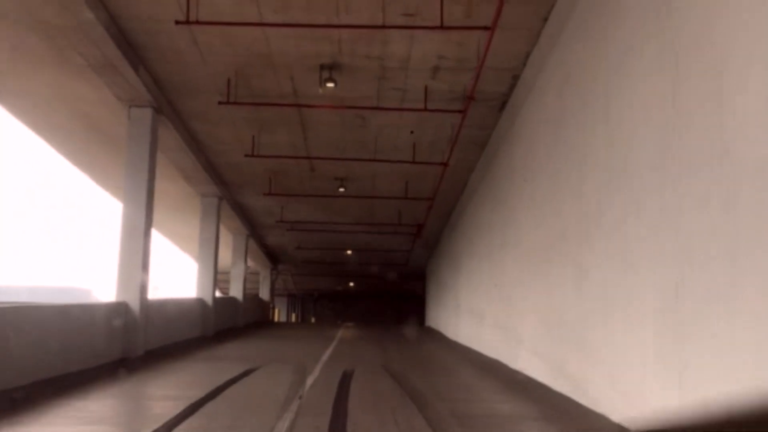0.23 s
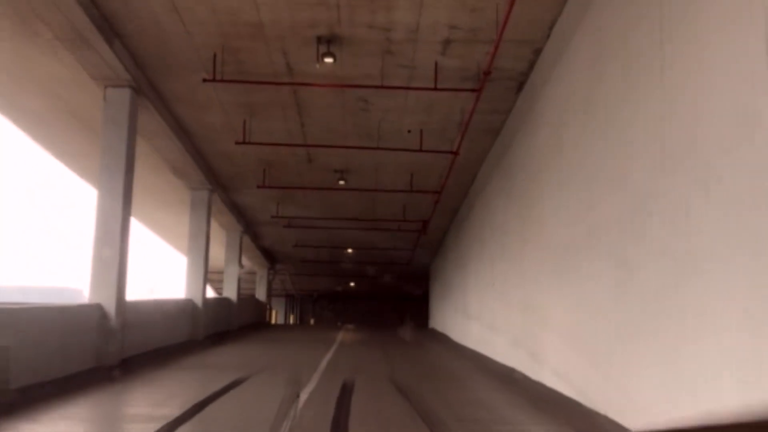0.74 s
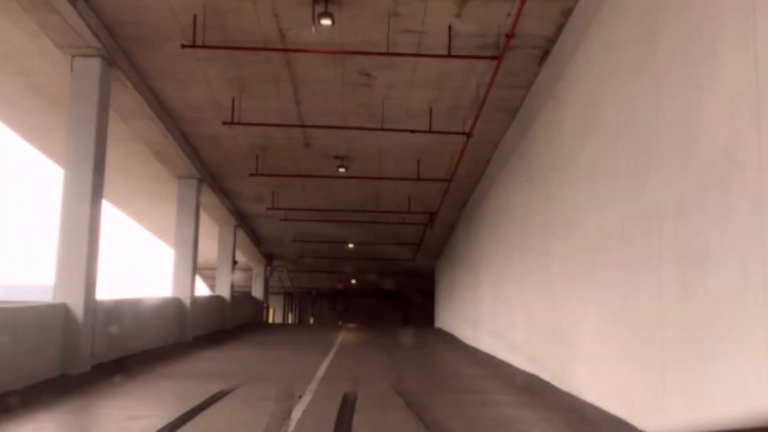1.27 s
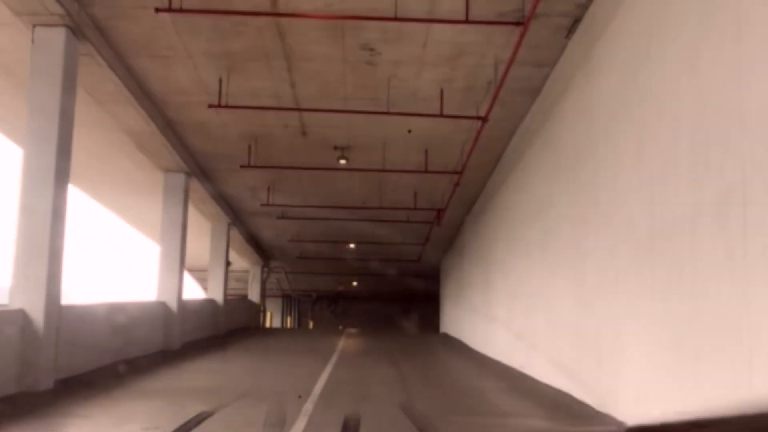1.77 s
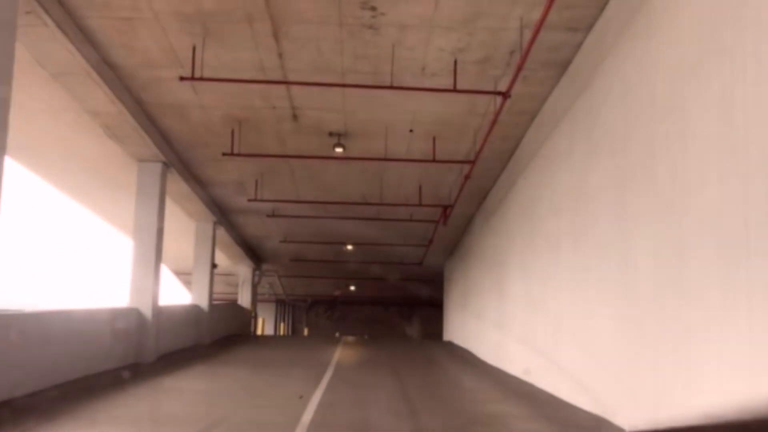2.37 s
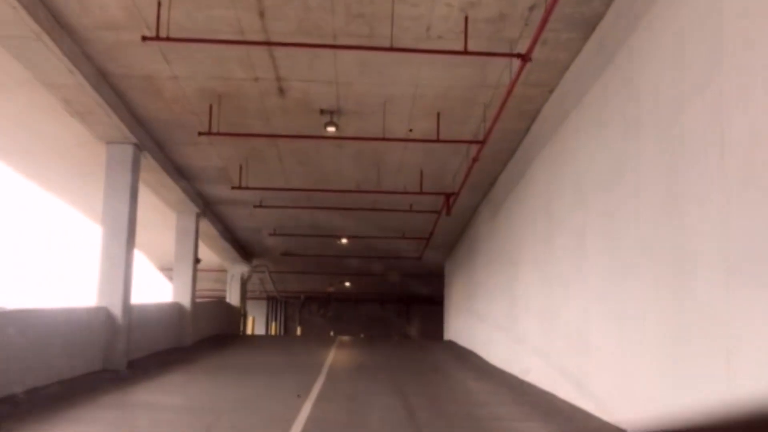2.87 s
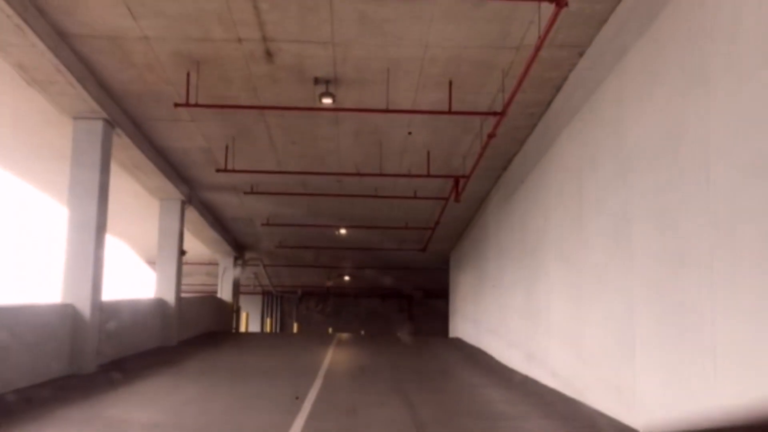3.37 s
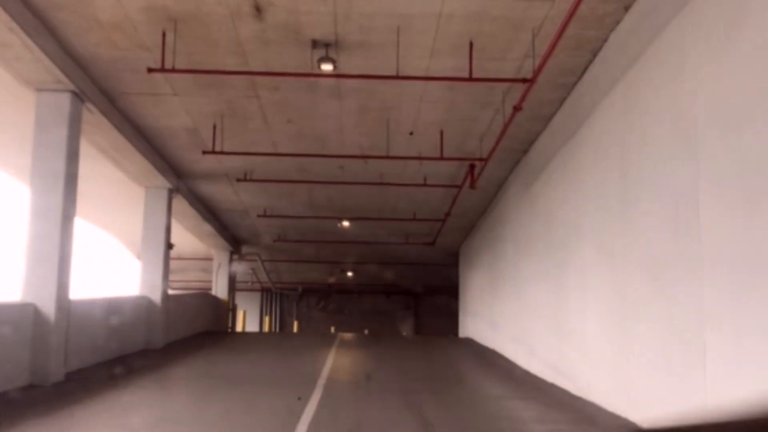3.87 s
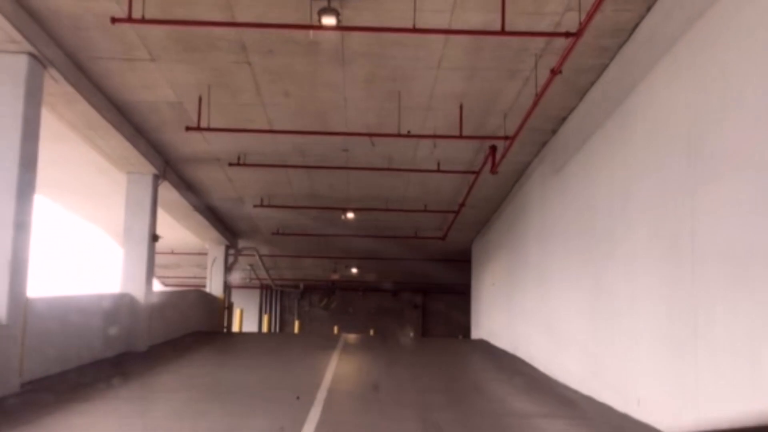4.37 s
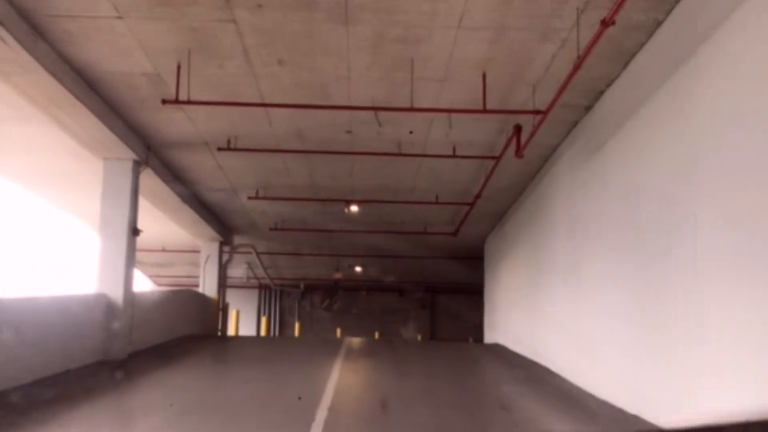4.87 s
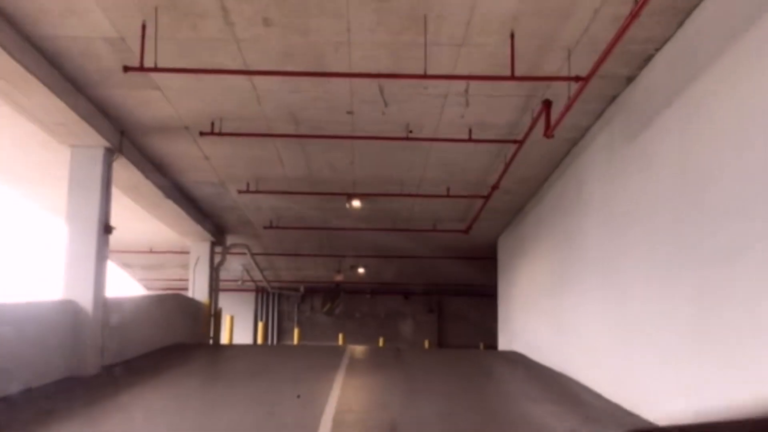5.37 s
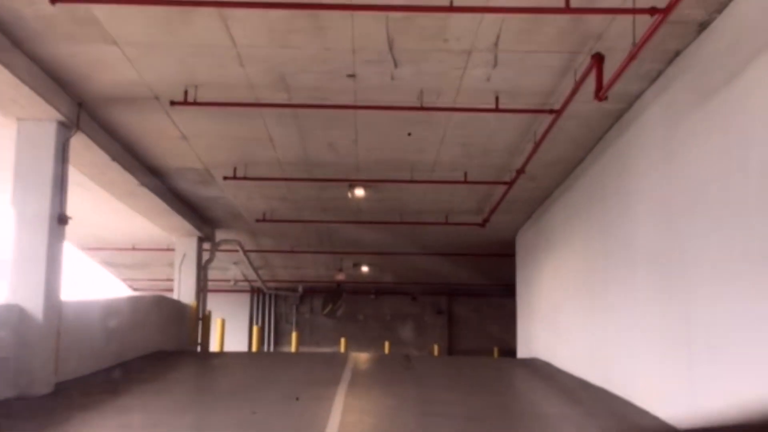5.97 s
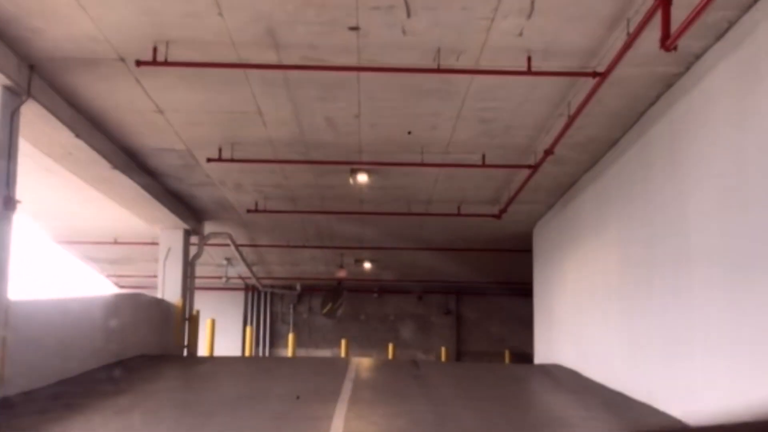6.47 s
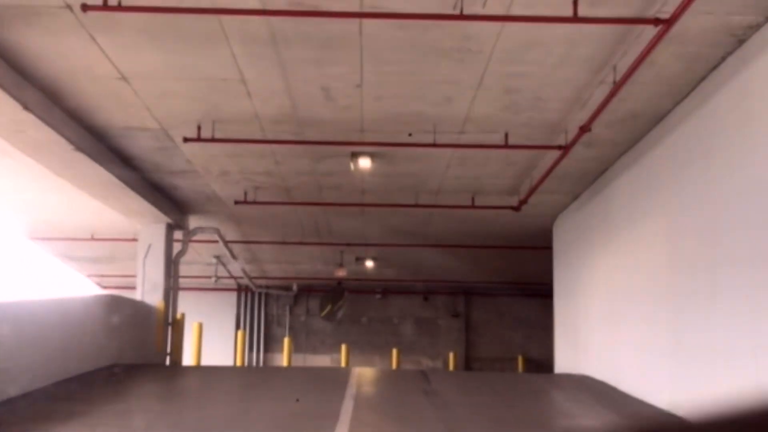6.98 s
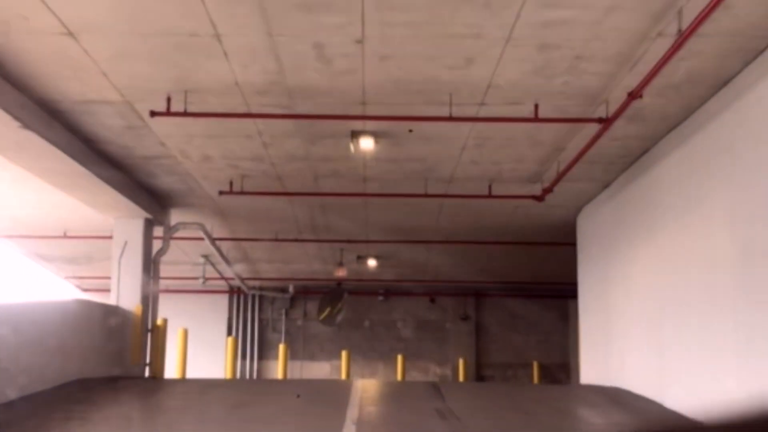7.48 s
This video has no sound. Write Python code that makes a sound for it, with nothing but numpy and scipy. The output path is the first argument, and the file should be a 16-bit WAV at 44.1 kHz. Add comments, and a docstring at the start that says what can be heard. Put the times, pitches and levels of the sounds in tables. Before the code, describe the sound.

The inside of a car driving slowly up a concrete ramp, about 7.7 seconds, continuous from start to end. A deep engine boom just under 60 hertz dominates, throbbing irregularly and beating with a weaker, slightly lower driveline hum. Muffled tyre rumble fills the bass, with faint roar in the mids that rises briefly on coarse patches, around 0.2, 1.5, 2.2, 3.1 and 4.4 seconds. Vents hiss softly and evenly above. At about 2.9 seconds the boom drops away, returning by 3.4 and strongest around 4 to 4.7. A low accessory hum near 90 hertz wavers, clearer after 4.5. Revs sag slightly from 5.2 to 6.4, where the boom dips again; a dull bump rocks the body at 6.6, with a lighter knock-like rumble at 6.8. Revs recover slightly and the drone continues. Dry, enclosed, single-channel cabin sound with gentle levelling.

```python
"""Car climbing a garage ramp

Inside a car on a concrete ramp at low, nearly steady revs. Vents hiss evenly, with faint early echoes.
A steady driveline hum beats against the engine's firing-order boom; a belt-driven accessory hums higher up.
Filtered noise makes the tyres: a body rumble that rocks on bumps, a roar that rises on coarse concrete.
Gentle gain control turns loud stretches, such as a strong boom, down and quiet ones up."""
import sys
import numpy as np
from scipy import signal
from scipy.fft import rfft, irfft
from scipy.io import wavfile

SR = 44100
rng = np.random.default_rng(int(sys.argv[2]) if len(sys.argv) > 2 else 0)


def transcribe(u):
    """Save the signal u as a 16-bit wav file named by the first command-line argument.

    u: samples, shape (n,) or (channels, n), limited to [-1, 1]; the rate is SR.
    q: integer samples, one column per channel.
    """
    v = np.clip(np.atleast_2d(u).T, -1, 1)
    q = np.round(v * 32767).astype(np.int16)
    wavfile.write(sys.argv[1], SR, q)


N = 340452  # length in samples


def undb(db):
    """Decibels to amplitude gain."""
    return 10 ** (np.asarray(db) / 20)


def unit(x):
    """Scale to rms 1."""
    return x / np.sqrt(np.mean(x ** 2))


def controls(table):
    """Each column after time, joined by straight lines at every sample."""
    times_s, *columns = np.transpose(table)
    t = np.arange(N) / SR
    return [np.interp(t, times_s, column) for column in columns]


def wander(rate_hz):
    """Smooth random motion of rms 1, mostly slower than the given rate."""
    f = np.arange(N // 2 + 1) * SR / N
    spectrum = rfft(rng.standard_normal(N))
    return unit(irfft(spectrum * np.exp(-(f / rate_hz) ** 2), N))


def swell(at_s, half_s):
    """A smooth bell-shaped rise to 1 and fall around a moment."""
    t = np.arange(N) / SR
    return np.exp(-((t - at_s) / half_s) ** 2)


def colour(x, points):
    """Shape a spectrum through (Hz, dB) points, rolled off below the first, then scale to rms 1."""
    hz, db = np.transpose(points)
    f = np.maximum(np.arange(N // 2 + 1) * SR / N, 1)
    curve_db = np.interp(np.log(f), np.log(hz), db)
    low_cut = np.minimum(f / hz[0], 1) ** 2
    return unit(irfft(rfft(x) * undb(curve_db) * low_cut, N))


def resonate(x, hz, width_hz):
    """One ringing resonance, scaled to rms 1."""
    b, a = signal.iirpeak(hz, hz / width_hz, fs=SR)
    return unit(signal.lfilter(b, a, x))


def cabin(x, count=40, longest_s=0.06, decay_s=0.053):
    """Glass and trim return faint early echoes that ripple the spectrum."""
    echo_db = -25  # against the direct sound, before the decay
    lags_s = rng.uniform(longest_s / 10, longest_s, count)
    signs = rng.choice([-1, 1], count)
    response = np.zeros(SR // 2)
    response[0] = 1  # direct sound
    response[(lags_s * SR).astype(int)] = undb(echo_db) * np.exp(-lags_s / decay_s) * signs
    return signal.fftconvolve(x, response / np.linalg.norm(response))[:N]


# air leaving the vents: (frequency [Hz], relative level [dB per Hz])
VENT_SPECTRUM = [(500, 0.5), (1900, 3.5), (2300, 4), (2720, 3.5), (2930, -1), (3600, 1), (4500, -1),
                 (4900, -5.5), (6000, -2), (7000, -2), (7600, -9.5), (9200, -11), (10300, -21.5),
                 (15800, -23.5)]
# narrow resonances of the air ducts: (frequency [Hz], width [Hz], level against the hiss [dB])
DUCT_RESONANCES = [(2127, 65, -12.5), (11500, 700, -28.5)]
# strength of the airflow: (time [s], hiss level [dB])
AIR_LEVEL = [(0, -53), (2.8, -53.5), (4.3, -54), (5.8, -54.5), (7.72, -54)]


def vents():
    """Turbulent air hisses from the grilles and rings the ducts faintly."""
    air_db, = controls(AIR_LEVEL)
    hiss = colour(rng.standard_normal(N), VENT_SPECTRUM) * undb(0.52 * wander(17))
    ducts = sum(undb(db) * resonate(rng.standard_normal(N), hz, width_hz)
                for hz, width_hz, db in DUCT_RESONANCES)
    return (hiss + ducts) * undb(air_db)


def driveline():
    """A weak hum at the steady road speed; it beats against the engine's boom."""
    hum_hz, hum_db = 54.3, -46.5
    turn = 2 * np.pi * hum_hz * np.arange(N) / SR + 0.5 * wander(1.3)
    return unit(np.sin(turn)) * undb(hum_db)


# hum of the belt-driven accessory: (time [s], first order level [dB], second order level [dB])
ACCESSORY_LEVELS = [(0, -52, -55), (2.7, -44.0, -49.5), (3.0, -53.5, -64), (4.7, -43, -48),
                    (5.2, -42.5, -54.5), (6.0, -40.5, -51.5), (6.8, -48, -48.5), (7.72, -41, -55)]


def accessory(phase):
    """A pulley geared to the crank hums unsteadily on its first two orders."""
    belt_ratio = 1.605  # pulley turns per firing
    turn = belt_ratio * phase + 0.24 * wander(3.8)
    first_db, second_db = controls(ACCESSORY_LEVELS)
    first = unit(np.sin(turn) * undb(2.0 * wander(18)))
    second = unit(np.sin(2 * turn) * undb(2.5 * wander(12)))
    return undb(first_db) * first + undb(second_db) * second


RUMBLE_DB, ROAR_DB = -39.5, -53  # body rumble, and tread roar away from coarse patches
BODY_WIDTH_HZ = 8.2  # width of the body's resonances
# road shake as the body passes it on: (frequency [Hz], relative level [dB per Hz])
BODY_SPECTRUM = [(23, -30), (37, 1), (51, 10), (67, -4), (80, 2.5), (110, -1.5), (140, -2), (212, -3),
                 (240, -9.5), (275, -7.5), (320, -10.5), (405, -12), (500, -23.5), (900, -54.5)]
# tread noise through the glass: (frequency [Hz], relative level [dB per Hz])
TREAD_SPECTRUM = [(300, -17.5), (520, -7.5), (670, -6.5), (770, -2.5), (920, -7), (1030, -5.5),
                  (1130, -0.5), (1350, -1), (1480, -5), (1700, -7), (1950, -17), (2600, -21), (5000, -41)]
# tread singing: (time [s], level [dB])
SINGING_LEVEL = [(0, -60), (1.7, -71), (2.3, -56.5), (3.6, -70), (6.0, -65), (6.9, -63.5), (7.72, -62)]
# coarse patches of concrete: (centre time [s], half length [s], rise of the roar [dB])
COARSE_PATCHES = [(.23, .11, 2), (1.5, 0.067, 2.5), (2.2, 0.18, 2), (2.744, .05, 1.5), (3.1, .14, 2),
                  (3.76, .07, 1.5), (4.252, 0.099, 1), (4.445, .03, 3), (6.5, .14, 0.2)]
# bumps that rock the body: (centre time [s], half length [s], resonance [Hz], level at the crest [dB])
ROAD_BUMPS = [(.52, .13, 50.4, -38), (4.33, 0.16, 208.4, -47), (5.63, 0.089, 49.2, -38),
              (6.612, 0.073, 52, -32), (6.82, 0.062, 208, -42)]


def tyres():
    """Rough concrete shakes the body, more on bumps; the tread roars and sings faintly on one resonance."""
    rumble = colour(rng.standard_normal(N), BODY_SPECTRUM)
    rocking = sum(resonate(rumble, hz, BODY_WIDTH_HZ) * swell(at_s, half_s) * undb(db)
                  for at_s, half_s, hz, db in ROAD_BUMPS)
    coarse_db = sum(rise_db * swell(at_s, half_s) for at_s, half_s, rise_db in COARSE_PATCHES)
    roar = colour(rng.standard_normal(N), TREAD_SPECTRUM) * undb(0.54 * wander(27))
    singing_db, = controls(SINGING_LEVEL)
    singing = resonate(rng.standard_normal(N), hz=833, width_hz=28)
    body = rumble * undb(RUMBLE_DB) + rocking
    tread = roar * undb(ROAR_DB + coarse_db) + singing * undb(singing_db)
    return body + tread


CRUISE_HZ, LUG_DB_PER_HZ = 58.6, 0.93  # overtones grow as the firing rate falls below this, and shrink above
# cabin boom at the firing rate: (time [s], level [dB])
BOOM_LEVEL = [(0, -34.5), (1.9, -37.5), (2.78, -36), (2.88, -48), (3.08, -54), (3.2, -38.5), (3.42, -32),
              (3.9, -34.5), (4.0, -29.5), (4.65, -30), (5.0, -35), (5.27, -32.5), (6.22, -35.5), (6.4, -53),
              (6.56, -35), (7.72, -36.5)]
# weak engine overtones: (multiple of the firing rate, level at the cruise firing rate [dB])
ENGINE_OVERTONES = [(1.499, -60), (2, -54.5), (2.25, -56.5), (2.5, -55), (3, -56), (4, -63.5), (4.5, -61.5)]


def engine(phase, firing_hz):
    """The firing order fills the cabin with a throbbing boom; its muffled overtones grow as the revs sag."""
    boom_db, = controls(BOOM_LEVEL)
    uneven = phase + 0.095 * wander(10)  # slightly irregular combustion
    boom = unit(np.sin(uneven) * undb(1.57 * wander(11))) * undb(boom_db)
    overtones = sum(unit(np.sin(multiple * uneven) * undb(4.6 * wander(3.3))) * undb(db)
                    for multiple, db in ENGINE_OVERTONES)
    labouring_db = LUG_DB_PER_HZ * (CRUISE_HZ - firing_hz)
    return boom + overtones * undb(labouring_db)


# engine revs: (time [s], firing rate [Hz])
FIRING_RATE = [(0, 59.07), (.5, 59.6), (2.7, 60.11), (3.25, 58.82), (5.2, 58.14), (5.65, 56.35),
               (6.4, 56.03), (6.8, 57.42), (7.72, 56.9)]


def scene():
    """Everything as heard from the front seat; engine and accessory share one crank phase."""
    firing_hz, = controls(FIRING_RATE)
    phase = 2 * np.pi * np.cumsum(firing_hz) / SR
    background = cabin(vents()) + driveline() + accessory(phase)
    mix = background + tyres() + engine(phase, firing_hz)
    return mix[None]  # one channel


def gain_control(x):
    """Follow the recent power and turn loud stretches down, quiet ones up."""
    pivot_db, ratio, lag_s = -31.5, 1.28, 0.15  # level left unchanged, compression, reaction time
    keep = np.exp(-1 / (lag_s * SR))
    power = (x / undb(pivot_db)) ** 2
    start = np.mean(power[:, :SR // 2])  # settled from the first sample
    recent, _ = signal.lfilter([1 - keep], [1, -keep], power, zi=[[start]])
    return x * np.sqrt(recent) ** (1 / ratio - 1)


def record(dry):
    """Gentle mono gain control, then a steep low-pass that removes the extreme top."""
    top_hz = 15750
    low_pass = signal.ellip(10, 0.2, 80, top_hz, fs=SR, output="sos")
    return signal.sosfilt(low_pass, gain_control(dry))


dry = scene()
out = record(dry)
transcribe(out)
```